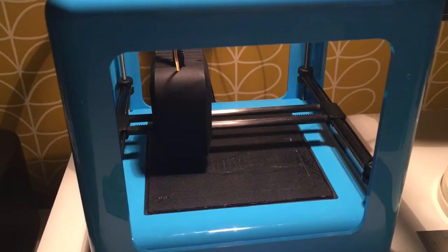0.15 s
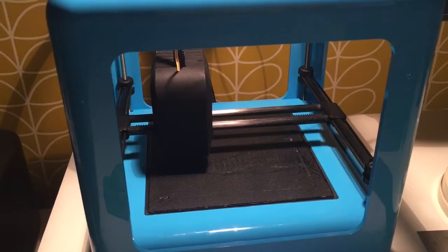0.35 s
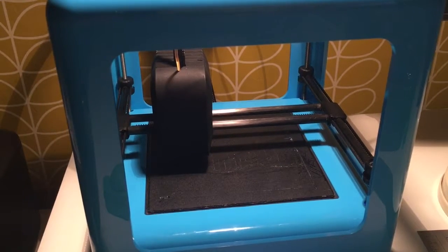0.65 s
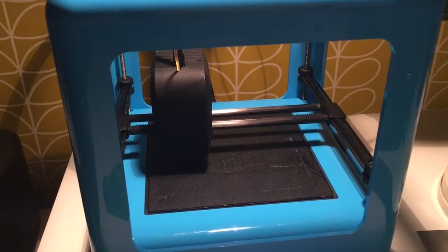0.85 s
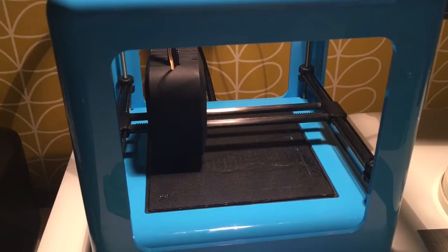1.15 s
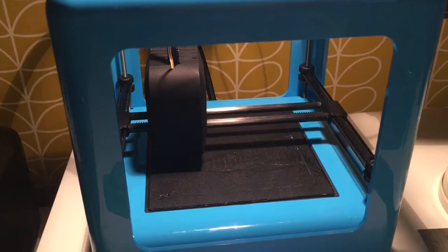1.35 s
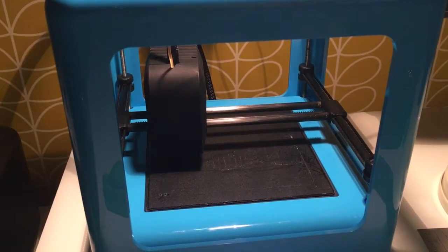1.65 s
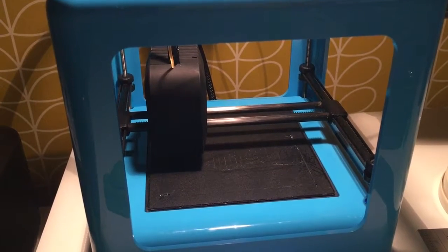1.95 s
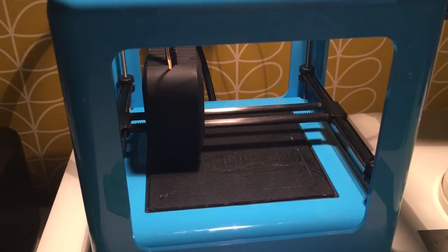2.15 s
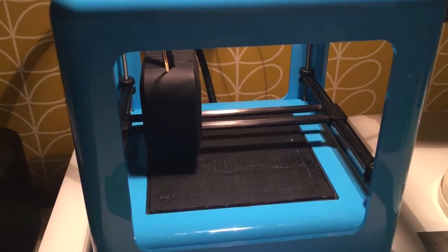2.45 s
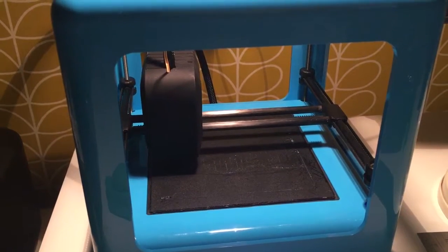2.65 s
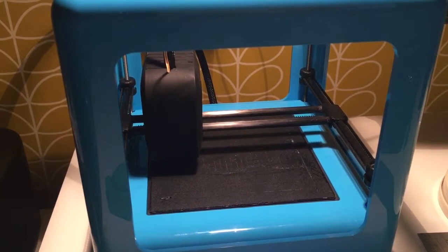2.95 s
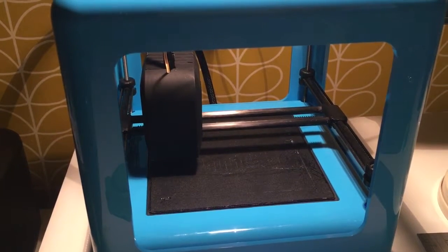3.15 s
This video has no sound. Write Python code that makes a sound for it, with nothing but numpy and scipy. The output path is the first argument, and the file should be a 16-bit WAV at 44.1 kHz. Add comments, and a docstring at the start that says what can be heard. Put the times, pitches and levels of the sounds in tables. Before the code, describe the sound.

3D printer idling with low fan hum and faint high whine, twice briefly nudging its print head.

```python
"""Desktop 3D printer with two short head moves

A fan rumbles and rushes (coloured noise), mains hum and fan tones sound (wavering sines), and the motor
drivers whine (high sines); the highest strong whine fades slowly and flares for a few milliseconds.
Twice a stepper motor nudges the print head for a fifth of a second: harmonics of the step rate, with
the noisy rasp of the carriage on its rods. Decaying rings with a crack of noise are the drive's ticks."""
import sys
import numpy as np
from scipy import signal
from scipy.fft import rfft, irfft
from scipy.io import wavfile

SR = 44100
rng = np.random.default_rng(int(sys.argv[2]) if len(sys.argv) > 2 else 0)


def to_wav(sig):
    """Store sig (one row per channel, or 1-D mono) as 16-bit WAV at the path in sys.argv[1].

    Samples outside -1..1 are clipped; the rate is SR.
    """
    pcm = np.clip(np.atleast_2d(sig), -1, 1) * 32767
    pcm = np.round(pcm).astype(np.int16)
    wavfile.write(sys.argv[1], SR, pcm.T)  # frames by channels


N = 145530

# head moves: (start [s], length [s], relative level [dB], decay constant of the rasp afterwards [s])
MOVES = [(0.933, 0.197, -0.5, 0.087), (2.144, 0.19, -1.1, .02)]
# spectrum of the carriage sliding on its rods: (frequency [Hz], relative density [dB per Hz])
RASP_SPECTRUM = [(900, -14), (2000, 6), (3300, -3), (4800, -1.5), (6500, -7), (7600, -10.5), (9800, -6.5),
                 (10900, -13), (12600, -8), (14500, -18), (15600, -10)]


def from_db(db):
    """Amplitude gain is ten to the power of a twentieth of the decibels."""
    return 10 ** (np.asarray(db) / 20)


def rms_one(x):
    """Normalise by the root mean square, a measure of signal power."""
    return x / np.sqrt(np.mean(x ** 2) + 1e-20)


def seconds():
    """Time is the sample index over the sampling rate [s]."""
    return np.arange(N) / SR


def drift(rate_hz):
    """Random modulation: white noise through a double-pole low-pass at rate_hz, with a spread of 1."""
    hop = 40  # samples between computed points
    pole = np.exp(-2 * np.pi * rate_hz * hop / SR)
    white = rng.standard_normal(N // hop + 2002)
    slow = signal.lfilter([1], [1, -2 * pole, pole ** 2], white)[2000:]  # drop the filter's onset
    return np.interp(np.arange(N) / hop, np.arange(len(slow)), rms_one(slow))


def coloured(source, spectrum):
    """Linear filtering: weight the source's spectrum, with steep skirts beyond the ends; rms 1."""
    hz, db = np.transpose(spectrum)
    f = np.maximum(np.arange(N // 2 + 1) * SR / N, 1)
    skirts = np.minimum(f / hz[0], 1) ** 6 * np.minimum(hz[-1] / f, 1) ** 8
    colour = from_db(np.interp(np.log(f), np.log(hz), db))
    return rms_one(irfft(rfft(source) * skirts * colour, N))


def noise(spectrum):
    """Broadband noise: Gaussian white noise shaped to a spectral density."""
    return coloured(rng.standard_normal(N), spectrum)


def tone(hz):
    """Frequency modulation: the phase of a sine of rms 1 is the running sum of its frequency."""
    cycles = np.cumsum(hz) / SR + rng.random()
    return np.sqrt(2) * np.sin(2 * np.pi * cycles)


def gate(start_s, length_s, decay_s):
    """Driven and free response: a quick linear rise, a hold, then exponential decay."""
    rise_s = 0.0046
    age = seconds() - start_s
    return np.clip(age / rise_s, 0, 1) * np.exp(-np.maximum(age - length_s, 0) / decay_s)


def casing(x, count=14):
    """Comb interference: short reflections from printer walls and room ripple the spectrum; rms 1."""
    first_s, last_s, echo_db = 0.002, 0.02, -23
    lags = (rng.uniform(first_s, last_s, count) * SR).astype(int)
    echoes = sum((-1) ** k * np.roll(x, lag) for k, lag in enumerate(lags))
    return rms_one(x + from_db(echo_db) * echoes)


def fan(flutter_db=0.48):
    """Flow and structural noise: steady low rumble of fan, frame and room, and fluttering rush of air."""
    # low rumble: (frequency [Hz], relative density [dB per Hz])
    rumble_spectrum = [(30, -7), (38, -2), (48, -0.5), (62, .5), (80, -2), (112, -4), (142, -10.5),
                       (167, -4.5), (195, -13), (220, -9), (245, -15), (272, -7), (298, -12.5),
                       (320, -17.5), (350, -16), (382, -14.5), (420, -23.5)]
    # rush of the fan's air: (frequency [Hz], relative density [dB per Hz])
    air_spectrum = [(430, -0.5), (520, 0), (640, -1), (800, -1.5), (950, -0.5), (1220, -2.9), (1400, -5.5),
                    (1950, -9.5), (2450, -13), (2900, -18), (3250, -16.5), (4450, -21.5), (5000, -26.5),
                    (5800, -26), (7800, -31), (9350, -28), (10500, -35), (11600, -31.5), (14000, -37),
                    (17000, -34)]
    rumble_db, air_db = -40.5, -54
    rumble = from_db(rumble_db) * noise(rumble_spectrum)
    air = from_db(air_db + flutter_db * drift(25)) * casing(noise(air_spectrum))
    return rumble + air


def hum(waver_hz=0.26, waver_db=0.85):
    """Periodic excitation: mains hum and faint fan tones are sines, wavering in pitch and level."""
    # mains hum and fan tones: (frequency [Hz], level [dB])
    hum_tones = [(100.0, -40.5), (494.5, -73.5), (719.3, -75)]
    out = np.zeros(N)
    for hz, db in hum_tones:
        level = from_db(db + waver_db * drift(3))
        out += level * tone(hz + waver_hz * drift(1.9))
    return out


def drivers(flicker_db=0.64, release_s=0.006):
    """Switching excitation: current choppers whistle in the coils, at other levels while the motor turns."""
    # pitch of each whine: (frequency [Hz])
    whine_hz = [7364, 9460, 9892, 10139, 10400, 15350]
    # the same whines: (level at rest [dB], level while moving [dB], pitch waver [Hz])
    whine_levels = [(-99, -98, 8), (-75.5, -78, 6.1), (-88, -78, 3.9), (-93, -92, 2.7), (-88.5, -77, 5.4),
                    (-103, -95, 30)]
    moving = sum(gate(start, length, release_s) for start, length, _, _ in MOVES)
    out = np.zeros(N)
    for hz, (rest_db, move_db, waver_hz) in zip(whine_hz, whine_levels):
        level_db = rest_db + (move_db - rest_db) * moving
        level = from_db(level_db + flicker_db * drift(9.1))
        out += level * tone(hz + waver_hz * drift(13))
    return out


def high_whine(waver_hz=11, flicker_db=1.8):
    """Amplitude and frequency modulation: the drivers' highest strong whine slowly fades and wavers."""
    # course of the whine: (time [s], level [dB])
    level_curve = [(0, -78), (.45, -77.5), (.9, -79), (1.15, -79), (1.7, -78), (2.3, -81), (2.65, -84),
                   (3.0, -85), (3.3, -81)]
    level_db = np.interp(seconds(), *np.transpose(level_curve))
    return from_db(level_db + flicker_db * drift(11)) * tone(11418 + waver_hz * drift(8))


def flares():
    """Gaussian tone bursts: the high whine flares for a few milliseconds now and then."""
    # flares: (time of the peak [s], peak level [dB])
    bursts = [(0.25, -69), (0.595, -75), (0.748, -76), (1.457, -74), (1.512, -74), (1.75, -74),
              (2.403, -76), (2.475, -76), (3.11, -73), (3.125, -75), (3.228, -71)]
    flare_hz, width_s = 11470, 0.0045
    t = seconds()
    envelope = sum(from_db(db) * np.exp(-((t - peak_s) / width_s) ** 2) for peak_s, db in bursts)
    return np.sin(2 * np.pi * flare_hz * t) * envelope


def ticks():
    """Impulse response: as the drive takes up its play, a short plastic ring and a crack of noise decay."""
    # ticks: (start [s], ring peak before decay [dB], ring frequency [Hz],
    #         ring's 60 dB decay time [s], crack level against the ring [dB])
    tick_table = [(0.932, -50.5, 3350, .012, -4), (1.02, -53.5, 3900, .01, 1),
                  (1.121, -62, 5050, 0.017, -7), (1.136, -46.5, 1930, 0.017, -8),
                  (2.149, -38.5, 2000, 0.016, -24), (2.158, -56, 2100, .008, -10),
                  (2.352, -56, 6800, .008, -1)]
    # colour of the crack: (frequency [Hz], relative density [dB per Hz])
    crack_spectrum = [(1000, -4), (2000, 4), (4500, -7), (7000, -10), (10000, -18), (15000, -21)]
    crack_t60_s = 0.02
    out, crack_noise = np.zeros(N), noise(crack_spectrum)
    for start, db, hz, ring_t60_s, crack_db in tick_table:
        age = np.maximum(seconds() - start, 0)
        ring = np.sin(2 * np.pi * hz * age) * np.exp(-np.log(1000) * age / ring_t60_s)
        crack_decay = (age > 0) * np.exp(-np.log(1000) * age / crack_t60_s)
        out += from_db(db) * (ring + from_db(crack_db) * crack_noise * crack_decay)
    return out


def grit():
    """Random impulse train: tiny catches of the bearings, uneven in size, excite the rasp's spectrum."""
    catches_per_s, spread_db = 210, 0.5
    sizes = from_db(spread_db * np.minimum(rng.exponential(1, N), 3))
    signs = rng.choice([-1, 1], N)
    caught = rng.random(N) < catches_per_s / SR
    return coloured(sizes * signs * caught, RASP_SPECTRUM)


def buzz(step_hz, count=80):
    """Harmonic series: the steps shake a dense comb of weak overtones out of the frame."""
    comb = sum(rng.rayleigh() * tone(k * step_hz) for k in range(1, count))
    return coloured(comb, RASP_SPECTRUM)


def stepper(speed_waver=0.00065, flicker_db=2.0, uneven_db=1.7):
    """Periodic forcing: the motor sings on multiples of its step rate; the carriage rasps in time with it."""
    # overtones of the motor: (multiple of the step rate, level [dB])
    motor_orders = [(1, -46.5), (2, -69), (5, -75), (12, -77), (14, -81), (16, -73), (17, -72), (31, -85),
                    (32, -78.5), (33, -92), (35, -84), (45, -89), (46, -86), (47, -91), (49, -85),
                    (63, -94), (64, -88), (66, -86), (80, -90)]
    note_decay_s = 0.031
    rasp_db, pulsing = -65.5, 0.12  # pulsing: rms depth at the step rate
    grit_share, buzz_share = 0.35, 0.5  # amplitudes against the smooth noise
    step_hz = 194.6 * (1 + speed_waver * drift(10.3))

    note = np.zeros(N)
    for order, db in motor_orders:
        note += from_db(db + flicker_db * drift(25)) * tone(round(order) * step_hz)

    sliding = rms_one(noise(RASP_SPECTRUM) + grit_share * grit() + buzz_share * buzz(step_hz))
    rasp_level = from_db(rasp_db + uneven_db * drift(40))
    rasp = rasp_level * sliding * (1 + pulsing * tone(step_hz))

    out = np.zeros(N)
    for start, length, db, rasp_decay_s in MOVES:
        gated_note = note * gate(start, length, note_decay_s)
        gated_rasp = rasp * gate(start, length, rasp_decay_s)
        out += from_db(db) * (gated_note + gated_rasp)
    return out


def scene():
    """Superposition: the sound pressures of all sources add, in one channel."""
    background = fan() + hum() + drivers() + high_whine() + flares()
    return (background + ticks() + stepper())[None]


def record(dry):
    """Band limiting: an elliptic low-pass cuts the top steeply."""
    cutoff_hz, ripple_db, stop_db = 15700, 0.1, 80
    low_pass = signal.ellip(12, ripple_db, stop_db, cutoff_hz, fs=SR, output="sos")
    return signal.sosfilt(low_pass, dry)


dry = scene()
out = record(dry)
to_wav(out)
```